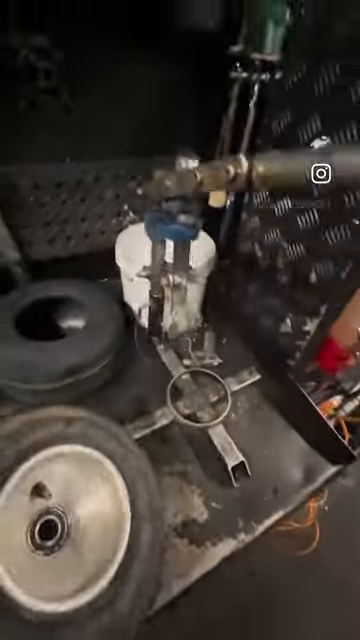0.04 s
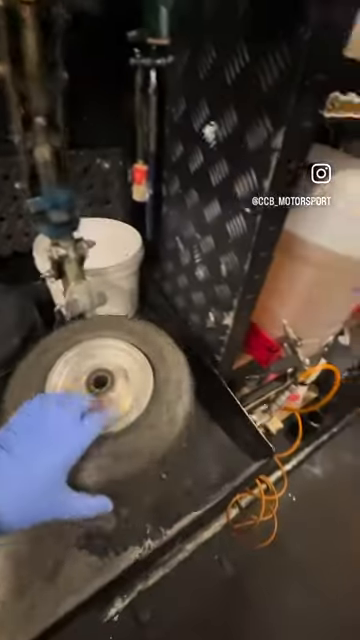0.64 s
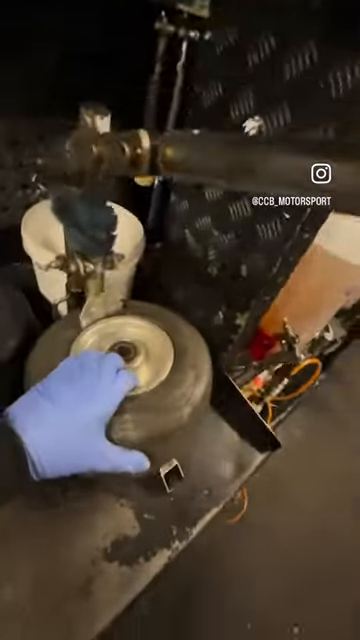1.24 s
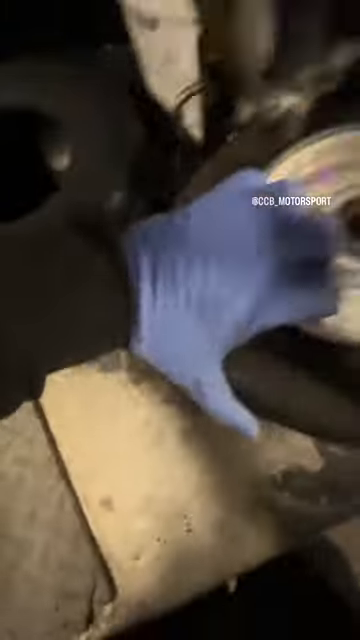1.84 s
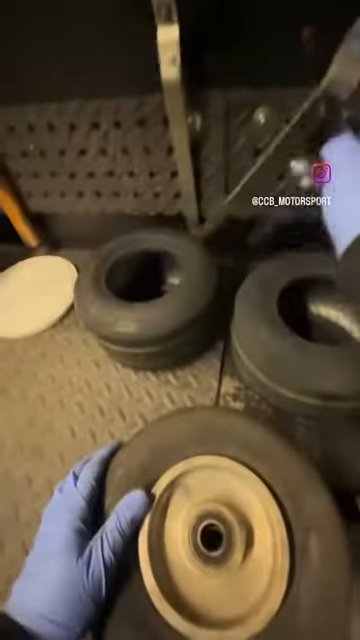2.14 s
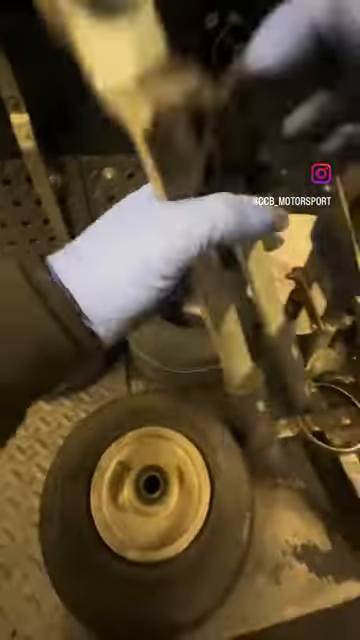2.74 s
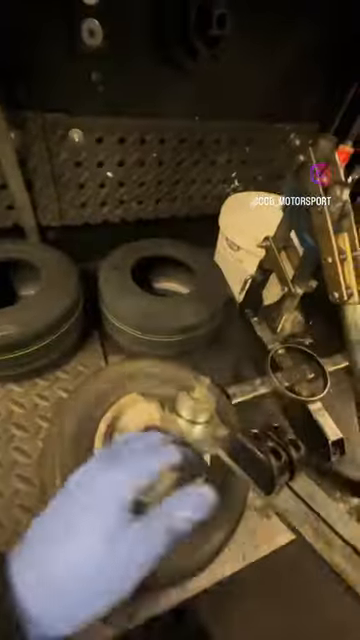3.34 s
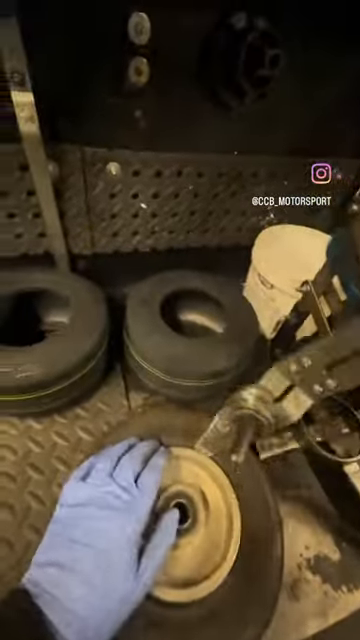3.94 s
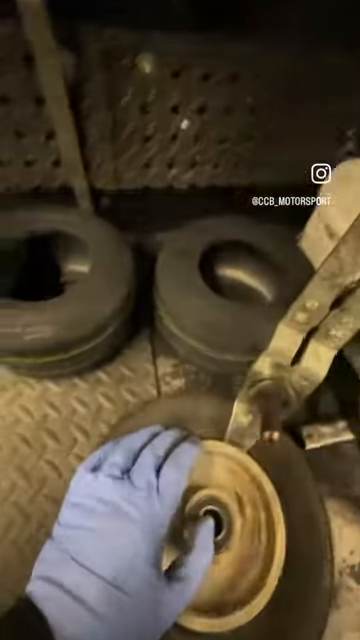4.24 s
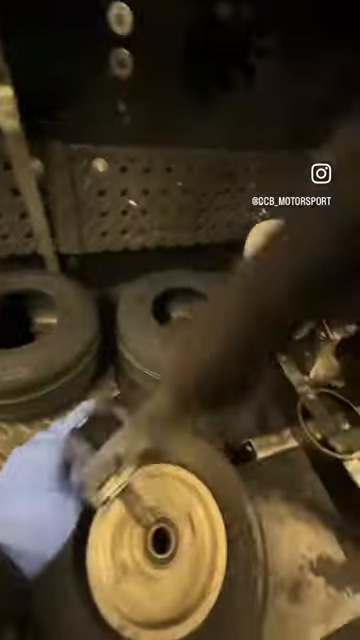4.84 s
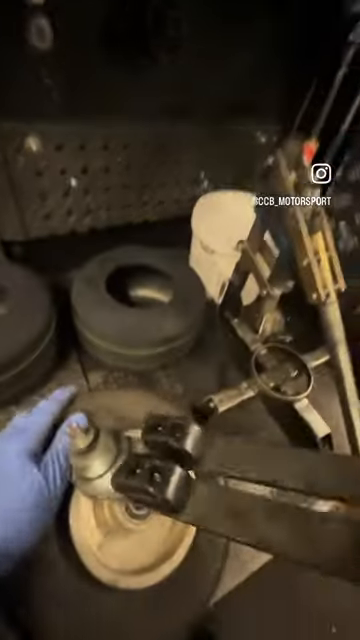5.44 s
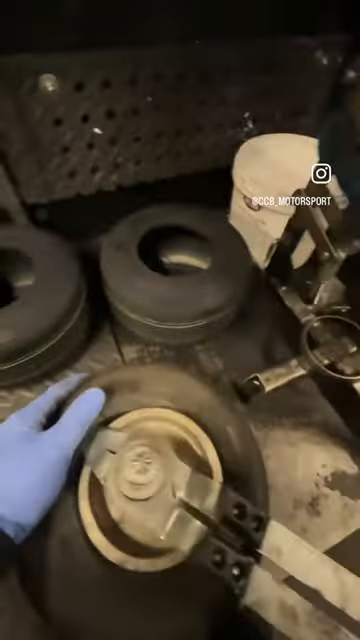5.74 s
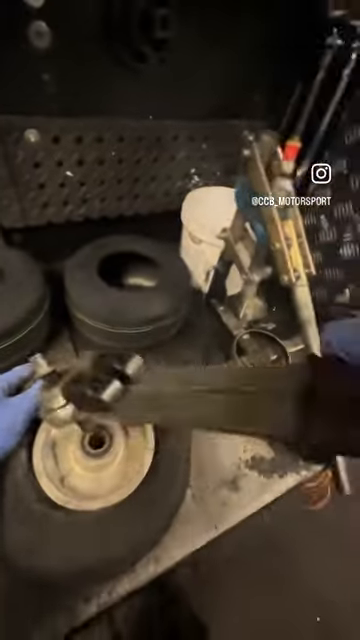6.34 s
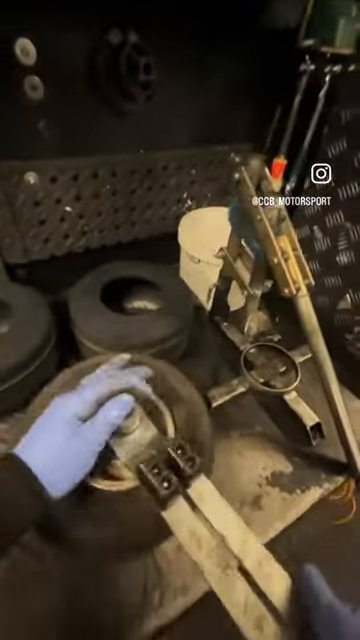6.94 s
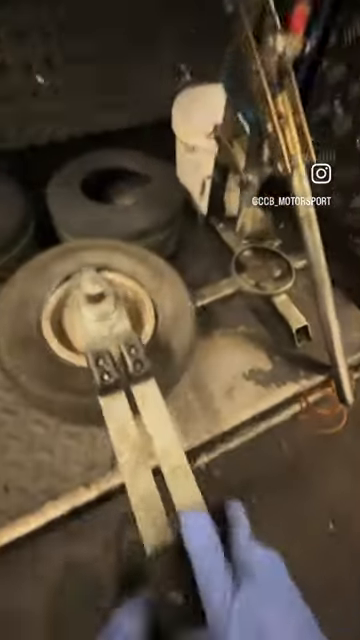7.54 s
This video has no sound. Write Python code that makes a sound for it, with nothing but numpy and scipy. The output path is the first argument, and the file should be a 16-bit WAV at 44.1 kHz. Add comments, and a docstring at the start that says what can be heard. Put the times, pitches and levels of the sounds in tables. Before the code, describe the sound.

A small wheel knocks on a steel bench as a tyre lever clanks, clinks and scrapes, with rubber rubbing and gloves rustling up close.

```python
"""A small wheel knocks on the steel bench of a manual tyre changer as it is dropped, dragged and levered.
Each knock rings the tyre and rim and shakes the bench. The lever's loose joint clinks, steel scrapes
on steel, and rubber rubs, skids and creaks as it sticks and slips. Gloves rustle and a sleeve brushes
the microphone. Everything is close, in a cramped workshop with little echo."""
import sys
import numpy as np
from scipy import signal
from scipy.fft import rfft, irfft
from scipy.io import wavfile

SR = 44100
rng = np.random.default_rng(int(sys.argv[2]) if len(sys.argv) > 2 else 0)


def pcm_store(signal):
    """Save signal as 16-bit PCM."""
    levels = np.round(np.clip(np.atleast_2d(signal), -1, 1) * 32767)
    wavfile.write(sys.argv[1], SR, levels.astype(np.int16).T)


N = 338688
TIME = np.arange(N) / SR
AGE = np.arange(SR // 2) / SR   # seconds since a knock
EARLY_TICK_LEAD_S, EARLY_TICK_DB = 0.0051, -16.5   # a faint early tick about 5 ms before each hit

# The modes (natural ringing notes) of the wheel and of the steel lever.
# Each row: pitch in Hz, level in dB, t60 (the seconds it takes to fade by 60 dB).
WHEEL_MODES = [(234.6, -4, 0.089), (270.7, 0, 0.21), (311, -8.5, 0.25), (361.5, 1, 0.17), (420.6, -7, 0.18),
               (489.4, 0.5, 0.16), (534, 5.5, 0.075), (620, -3, 0.056)]
LEVER_MODES = [(941, 5.5, 0.14), (1091, -7, 0.14), (1322, 4.5, 0.096), (1677, -2.5, 0.067),
               (2150, -1, 0.16), (2256, 7.5, 0.13), (2930, 3, 0.14), (3130, 9.5, 0.064), (3310, -6.5, 0.17),
               (3570, -11, 0.17), (4030, -10.5, .11), (4600, -9, 0.12), (7150, -4, .14),
               (8340, -14.5, 0.22)]
# The microphone's two openings. Each row: frequency in Hz, how alike room sound is in both (-1 to 1),
# how far the left leads in radians, how much louder the left is in dB.
MIC_PORTS = [(60, .98, -.25, .4), (149, .97, .45, -.3), (302, 0.99, -1.18, -3.5), (547, 0.015, 0.98, -2),
             (860, -0.52, -0.54, 1.5), (1180, -0.18, 0.7, 2), (1890, 0.68, 0.82, 1), (2800, -0.59, 4, -1.5),
             (4330, 0.4, 3.5, -1.5), (6240, 0.81, 3.5, 0), (8600, 0.67, 6.5, -1), (9920, 1, 9, 1)]


def from_db(db):
    """Turn decibels into a number to multiply by."""
    return 10 ** (np.asarray(db) / 20)


def rms_one(x):
    """Scale a sound so that its average strength (rms) is 1."""
    return x / np.sqrt(np.mean(x ** 2) + 1e-20)


def unit_blow(x):
    """Scale a hit so that its first 30 ms have an average strength of 1."""
    return x / np.sqrt(np.mean(x[..., :SR * 3 // 100] ** 2) + 1e-20)


def add(out, start_s, sound):
    """Mix a short sound in at a given time."""
    start = round(start_s * SR)
    out[:, start:start + len(AGE)] += sound[..., :N - start]


def at_hz(rows, hz, column=1):
    """Look up a table's value at any frequency, sliding between its rows."""
    table = np.array(rows)
    return np.interp(np.log(np.maximum(hz, 1)), np.log(table[:, 0]), table[:, column])


def band(x, low_hz, high_hz, order=2):
    """Keep the part of a sound between two frequencies."""
    edges = [low_hz, min(high_hz, SR / 2 - 1)]
    return signal.sosfilt(signal.butter(order, edges, "band", fs=SR, output="sos"), x)


def drift(per_s):
    """A value that wanders at random."""
    points = rng.standard_normal(int(N / SR * per_s) + 2)
    return np.interp(TIME * per_s, np.arange(len(points)), points)


def diffuse(size):
    """Stereo noise, as alike on left and right as sound arriving from all around."""
    alike = np.clip(at_hz(MIC_PORTS, np.fft.rfftfreq(size, 1 / SR)), -1, 1)
    mid, side = rfft(rng.standard_normal((2, size)))
    return irfft(np.sqrt((1 + alike) / 2) * mid + np.sqrt((1 - alike) / 2) * side * [[1], [-1]], size)


def colour(noise, tone):
    """Shape a noise's lows and highs by a table, cutting steeply beyond its ends."""
    hz = np.fft.rfftfreq(N, 1 / SR) + 1
    roll_off = np.minimum(1, np.minimum(hz / tone[0][0], tone[-1][0] / hz)) ** 6
    return rms_one(irfft(rfft(noise) * from_db(at_hz(tone, hz)) * roll_off, N))


def slips(per_s, spread_db):
    """Uneven random clicks of a surface that sticks and lets go."""
    sizes = from_db(spread_db * np.minimum(rng.exponential(1, N), 4)) * rng.choice([-1, 1], N)
    return rms_one(sizes * (rng.random(N) < per_s / SR))


def dying(t60):
    """A fade that falls 60 dB in t60 seconds."""
    return np.exp(-np.log(1000) * AGE / t60)


def swells(moves, still_db, edge_db):
    """Loudness of movements rising out of a steady background, each edge_db down at its ends."""
    power = sum(from_db(db - edge_db * np.abs(2 * (TIME - middle_s) / length_s) ** 1.5) ** 2
                for middle_s, length_s, db in moves)
    return np.sqrt(from_db(still_db) ** 2 + power)


def slide(start_s, length_s, rise_s, sag_db_per_s, fade_db_per_s):
    """Loudness of a sliding touch: it builds up, sags while it lasts and fades away."""
    age = np.maximum(TIME - start_s, 0)
    drop_db = sag_db_per_s * age + fade_db_per_s * np.maximum(age - length_s, 0)
    return np.minimum(age / rise_s, 1) * from_db(-drop_db)


def ringing(modes, scatter_db):
    """Modes struck together, each with a random strength and point in its cycle."""
    return sum(from_db(db + scatter_db * rng.standard_normal()) * dying(t60)
               * np.sin(2 * np.pi * (hz * AGE + rng.random())) for hz, db, t60 in modes)


def favoured(modes, pitch_hz, spread_octaves):
    """The spot that is hit brings out the modes near one pitch."""
    return [(hz, db - 6 * min((np.log2(hz / pitch_hz) / spread_octaves) ** 2, 3), t60)
            for hz, db, t60 in modes]


def burst(low_hz, high_hz, t60, room_db, room_t60):
    """A click sets many modes going; they die fast and leave a weaker tail in the room."""
    room = diffuse(len(AGE))
    direct = (0.7 * rng.standard_normal(len(AGE)) + 0.73 * room) * dying(t60)
    direct[:, 0] += 0.72 * np.linalg.norm(direct[0])   # the click
    tail = from_db(room_db) * room * dying(room_t60)
    return unit_blow(band(direct + tail, low_hz, high_hz, order=3))


def shoves():
    """As weight shifts on the wheel, the bench rumbles and rubber creeps over steel."""
    # Each row: middle in seconds, length in seconds, rumble level in dB, rub level in dB.
    pushes = [(0.76, 0.75, -33, -32), (1.312, 0.16, -52, -32.5), (1.756, 0.3, -30.5, -39),
              (2.246, 0.26, -38, -41), (3.376, 0.19, -36.5, -63), (4.278, 0.32, -26.5, -30),
              (4.752, 0.49, -33, -31.5), (5.627, 0.4, -32.5, -34), (6.656, 0.11, -25, -26.5),
              (7.283, 1, -39, -41), (7.68, 0.24, -42.5, -29.5)]
    # The tone of the bench and of the rubber. Each row: frequency in Hz, level in dB.
    rumble_tone = [(12, -56), (20, -25), (31, -25), (49, 4), (76, -2.5), (108, 4.5), (189, -13.5),
                   (230, -15.5), (300, -15.5), (510, -120)]
    rub_tone = [(120, -38.5), (200, -10.5), (232, -3), (387, 0.5), (411, 2), (474, -3), (801, -8.5),
                (1000, -14), (1300, -31.5), (2200, -120)]
    rumble = swells([(s, length, db) for s, length, db, _ in pushes], still_db=-40.5, edge_db=6)
    rub = swells([(s, length, db) for s, length, _, db in pushes], still_db=-44.5, edge_db=6.5)
    creep = (diffuse(N) + 0.39 * slips(per_s=120, spread_db=-3.5)) * from_db(0.87 * drift(per_s=22))
    return rumble * colour(diffuse(N), rumble_tone) + rub * colour(creep, rub_tone)


def gloves():
    """A sliding glove or sleeve rustles, with a fine hiss on top."""
    # Each row: middle in seconds, length in seconds, rustle level in dB, hiss in dB above the rustle.
    strokes = [(0.147, 0.34, -44, -8.5), (0.597, 0.28, -30.5, -14), (0.892, 0.54, -42, -12.5),
               (1.405, 0.29, -36, -4.5), (1.748, 0.33, -36.5, -18.5), (1.882, 0.14, -46.5, -0.5),
               (2.63, 0.31, -43, 1.5), (2.958, 0.28, -41.5, -9.5), (3.287, 0.34, -41.5, -5.5),
               (3.776, 0.22, -43, -1.5), (4.241, 0.45, -40.5, -11), (4.623, 0.32, -35.5, -5.5),
               (5.068, 0.39, -44, -1.5), (5.512, 0.4, -41.5, -8.5), (5.784, 0.31, -42.5, -16.5),
               (6.637, 0.16, -36.5, -9.5), (6.816, 0.12, -39.5, -12.5), (7.11, 0.18, -50, -1),
               (7.38, 0.27, -45.5, -12.5), (7.54, 0.11, -40, -0.5), (7.68, 0.11, -30, -16)]
    # The two tones of the cloth. Each row: frequency in Hz, level in dB.
    rustle_tone = [(530, -26), (900, 2), (1050, 1.5), (1450, 1), (2430, -1.5), (2690, 1.5), (2940, -4),
                   (4350, 2), (5600, -8), (7800, -63.5), (13200, -120)]
    hiss_tone = [(5500, -7), (6800, -4.5), (8200, -7.5), (9300, -9), (10500, -30)]
    rustle = swells([(s, length, db) for s, length, db, _ in strokes], still_db=-51.5, edge_db=8.5)
    hiss = swells([(s, length, db + hiss_db) for s, length, db, hiss_db in strokes],
                  still_db=-63, edge_db=9.5)
    cloth = (diffuse(N) + 0.44 * slips(per_s=130, spread_db=4)) * from_db(1.04 * drift(per_s=35))
    return rustle * colour(cloth, rustle_tone) + hiss * colour(cloth, hiss_tone)


def rim_scrapes():
    """The rim catches on steel in quick little jerks that ring the lever."""
    # Each row: start in seconds, length in seconds, level in dB, strongest pitch in Hz.
    scrapes = [(0.118, .035, -37, 1980), (0.511, 0.0074, -25.5, 2900), (1.846, 0.017, -37.5, 2700),
               (4.164, 0.031, -17, 3680), (5.804, 0.02, -36.5, 1590), (6.387, 0.016, -29, 2950),
               (7.092, 0.018, -40.5, 3500), (7.616, 0.1, -34.5, 2210)]
    out = np.zeros((2, N))
    grinding = slips(per_s=940, spread_db=5) + 0.63 * diffuse(N)
    grit = rms_one(band(grinding, 620, 5000))
    for start_s, length_s, db, pitch_hz in scrapes:
        screech = rms_one(band(grinding, 0.88 * pitch_hz, pitch_hz / 0.88, order=1))
        level = from_db(db) * slide(start_s, length_s, rise_s=0.0017, sag_db_per_s=37, fade_db_per_s=896)
        out += level * (from_db(-6.5) * grit + from_db(-1.5) * screech)
    ring = signal.fftconvolve(out, ringing(LEVER_MODES, scatter_db=2)[None], axes=1)[:, :N]
    return out + from_db(-9.5) * rms_one(ring) * np.sqrt(np.mean(out ** 2))


def steel_blow(hardness_db):
    """Steel hits steel with a low clank, a crack and a high tick; harder hits sound brighter."""
    lower = burst(610, 1214, t60=0.05, room_db=-16, room_t60=0.55)
    upper = burst(915, 2660, t60=0.021, room_db=-14.5, room_t60=0.2)
    clank = unit_blow(lower + from_db(np.clip(0.5 * hardness_db - 1.5, -6, 8)) * upper)
    crack = burst(2500, 5380, t60=0.044, room_db=-19.5, room_t60=0.25)
    tick = burst(3500, 8800, t60=0.021, room_db=-20, room_t60=0.17)
    return from_db(-hardness_db) * clank + from_db(-2) * crack + from_db(hardness_db - 12) * tick


def ping(hz, t60):
    """One short note of steel."""
    return unit_blow(ringing([(hz, 0, t60)], scatter_db=0))


def lever_note(note_hz):
    """The lever pings at one note, and its modes near that note ring on."""
    ring = unit_blow(ringing(favoured(LEVER_MODES, note_hz, spread_octaves=0.37), scatter_db=1))
    return unit_blow(ping(note_hz, t60=0.035) + from_db(-3) * ring)


def wheel_bonk(pitch_hz, swell_s=0.0031):
    """A hollow bonk that the rubber soon stops; the wheel rings on softly, with a short rattle."""
    bonk = unit_blow((AGE / swell_s) * np.exp(-AGE / swell_s) * np.sin(2 * np.pi * pitch_hz * AGE))
    fade_in = (1 - np.exp(-AGE / (2 * swell_s))) ** 2
    ring = fade_in * ringing(favoured(WHEEL_MODES, pitch_hz, spread_octaves=0.24), scatter_db=3.5)
    rattle = burst(0.62 * pitch_hz, 1.5 * pitch_hz, t60=0.055, room_db=-9, room_t60=0.42)
    return unit_blow(bonk + from_db(-3.5) * unit_blow(ring) + from_db(-5) * rattle)


def bench_thud(rise_s=0.021):
    """The heavy bench takes a moment to get moving, then booms and rattles."""
    # Each row: pitch in Hz, level in dB, seconds to fade by 60 dB.
    bench_modes = [(63, -4.5, 0.36), (95.4, -9.5, 0.17), (111.8, 6, 0.2), (141.6, 4, 0.19),
                   (173.2, -4.5, 0.21)]
    boom = unit_blow(ringing(bench_modes, scatter_db=-3))
    rattle = from_db(-2) * burst(53, 210, t60=0.18, room_db=-15, room_t60=0.92)
    return 1.48 * (boom + rattle) * (1 - np.exp(-AGE / rise_s))


def knocks():
    """Each knock sounds steel, lever, wheel and bench at once, just after a faint early tick."""
    # Each row: start in seconds, bench level in dB, wheel level in dB, wheel pitch in Hz, steel level
    # in dB, hardness in dB (more is brighter), lever note in Hz, that note's level in dB.
    hits = [(.239, -49, -28, 420, -30.5, 7.5, 2900, -53), (0.428, -38.5, -12.5, 545, -25.5, -3, 905, -22),
            (.446, -19.5, -12, 473, -25.5, 1, 1620, -30.5), (.507, -17.5, -15, 625, -23, -3, 2800, -26),
            (.527, -21.5, -14.5, 478, -35, -11, 915, -27), (.661, -19.5, -24, 400, -32, -3.5, 2800, -37),
            (.832, -22.5, -11.5, 497, -23, 0, 722, -27), (.859, -26, -16, 481, -34, -4, 1690, -37),
            (0.966, -28.5, -25.5, 232, -45, 6, 915, -51), (1.29, -31, -29, 527, -60, -3, 940, -53),
            (1.632, -36, -29.5, 310, -45, -5, 955, -52.5),
            (2.069, -29.5, -28.5, 292, -22.5, 5.5, 1842, -28.5),
            (2.152, -26.5, -17, 343, -36, -10, 953, -38), (3.26, -52, -30.5, 493, -19.5, 6.5, 1855, -28),
            (3.269, -30.5, -27, 464, -28.5, 11, 2900, -38.5), (3.566, -29, -35.5, 343, -27, 10, 3320, -36),
            (3.588, -53, -28.5, 310, -29, 5.5, 4160, -35), (4.045, -21, -20, 323, -27.5, -3.5, 1037, -25.5),
            (4.168, -12, -19, 332, -23.5, 12, 3600, -26.5), (4.195, -13, -16.5, 327, -23.5, 4, 2830, -20),
            (4.31, -22.5, -20.5, 250, -66, -8, 920, -51), (4.343, -11.5, -8, 315, -23.5, -4.5, 1193, -22.5),
            (4.441, -14, -16, 324, -20, 12, 3000, -13.5), (4.59, -16.5, -10, 460, -26.5, -2.5, 870, -37),
            (4.693, -20, -11.5, 480, -35.5, -7, 1390, -38), (4.742, -40, -16, 519, -34, 2.5, 960, -29),
            (4.875, -26, -10, 487, -34, -5.5, 1140, -39), (4.927, -25, -22, 498, -30, -1, 2870, -36.5),
            (5.329, -20, -10.5, 516, -29, -8.5, 1204, -33),
            (5.349, -17.5, -13.5, 478, -27.5, -7, 1600, -29), (5.42, -19, -24.5, 393, -41, 4, 1286, -42),
            (5.505, -16, -15.5, 412.5, -21, -2, 1735, -23), (5.543, -18, -19.5, 336, -29, 13, 1420, -32),
            (5.771, -20, -20.5, 421, -38, -12.5, 920, -50), (5.806, -45, -25, 416, -38.5, -11, 1035, -33.5),
            (5.982, -35, -24, 395, -39.5, -2.5, 3010, -42.5), (6.38, -45, -22.5, 614, -32, -7, 930, -31.5),
            (6.392, -18.5, -12.5, 422, -31.5, -8.5, 3060, -44),
            (6.538, -26.5, -30.5, 340, -57, -13, 1730, -45),
            (6.659, -16.5, -29.5, 355, -37.5, -11.5, 1600, -33.5),
            (6.671, -20.5, -23, 370, -28.5, -2, 1375, -27), (6.792, -31, -28, 400, -34, -8, 2050, -33),
            (6.921, -19.5, -21, 380, -50, -24, 1224, -31.5),
            (7.568, -23, -28.5, 500, -28.5, 5.5, 3240, -32)]
    out = np.zeros((2, N))
    for start_s, bench_db, wheel_db, pitch_hz, steel_db, hardness_db, note_hz, note_db in hits:
        steel = from_db(steel_db) * steel_blow(hardness_db)
        lever = from_db(note_db) * lever_note(note_hz)
        wheel = from_db(wheel_db) * wheel_bonk(pitch_hz)
        bench = from_db(bench_db) * bench_thud()
        add(out, start_s, steel + lever + wheel + bench)
        early_tick = from_db(EARLY_TICK_DB + 0.5 * min(hardness_db, 0)) * steel   # weaker for dull hits
        add(out, start_s - EARLY_TICK_LEAD_S * rng.uniform(0.52, 1.7), early_tick)
    return out


def tyre_skids():
    """Rubber sticks and slips on the bench, and each slip sets the wheel ringing."""
    # Each row: start in seconds, length in seconds, level in dB.
    skids = [(0.455, 0.053, -13), (0.584, 0.077, -15), (3.276, 0.075, -28.5), (7.655, .025, -19.5)]
    level = sum(from_db(db) * slide(start_s, length_s, rise_s=0.0025, sag_db_per_s=60, fade_db_per_s=278)
                for start_s, length_s, db in skids)
    grip = level * (slips(per_s=530, spread_db=4.5) + 1.04 * diffuse(N))
    wheel = ringing(favoured(WHEEL_MODES, pitch_hz=470, spread_octaves=0.55), scatter_db=2)
    groan = signal.fftconvolve(band(grip, 190, 800), wheel[None], axes=1)[:, :N]
    grit = band(grip, 540, 864)
    return (rms_one(groan) + from_db(-5) * rms_one(grit)) * np.sqrt(np.mean(level ** 2))


def tread_creaks():
    """The gripped tread lets go in small, dry ticks."""
    # Each row: start in seconds, level in dB.
    ticks = [(1.176, -41), (1.188, -40.5), (1.209, -39), (1.22, -36.5), (1.235, -37.5), (1.282, -38),
             (3.009, -42), (3.042, -39.5), (6.553, -46), (7.421, -43.5), (7.524, -36.5), (7.538, -38),
             (7.552, -33.5)]
    out = np.zeros((2, N))
    for start_s, db in ticks:
        add(out, start_s, from_db(db) * burst(720, 5560, t60=0.015, room_db=-9, room_t60=0.043))
    return out


def sleeve_brush(start_s=1.386, length_s=0.07, squeak_s=0.014, squeak_hz=3470):
    """Cloth hisses and squeaks on the microphone, then lies flat, rasps and pumps air into it."""
    flat_s = start_s + squeak_s
    hiss = from_db(-12) * slide(start_s, length_s, rise_s=0.0039, sag_db_per_s=68, fade_db_per_s=647)
    squeak = from_db(-17) * slide(start_s, squeak_s, rise_s=0.008, sag_db_per_s=0, fade_db_per_s=700)
    rasp = from_db(-16) * slide(flat_s, length_s - squeak_s,
                                rise_s=0.016, sag_db_per_s=23, fade_db_per_s=906)
    puff = from_db(-14) * slide(flat_s, length_s=0.071, rise_s=0.018, sag_db_per_s=21, fade_db_per_s=384)
    threads = rng.standard_normal((2, N)) + 0.57 * slips(per_s=820, spread_db=1)
    whistle = rms_one(band(threads, 0.98 * squeak_hz, 1.02 * squeak_hz))
    bright = rms_one(band(threads, 2870, 4130)) + 0.52 * rms_one(band(threads, 6700, 8440))
    rough = rms_one(band(threads, 350, 1940))
    sway = signal.hilbert(band(rng.standard_normal(N), 52, 72))
    air = rms_one(np.cos(np.angle(sway)))   # an uneven flutter of even strength
    flap = from_db(-10) * rms_one(band(rng.standard_normal(N), 97, 258))
    return hiss * rms_one(bright) + squeak * whistle + rasp * rough + puff * (air + flap)


def microphone_bump(start_s=1.583, swell_s=0.009, final_hz=58, db=-11):
    """The arm bumps the microphone as it moves off: a soft thump that drops to a deep note."""
    out = np.zeros((2, N))
    hz = final_hz * (1 + 3 * dying(t60=0.027))
    level = from_db(db) * (AGE / swell_s) * np.exp(1 - AGE / swell_s)
    add(out, start_s, level * np.sin(2 * np.pi * np.cumsum(hz) / SR))
    return out


def joint_clinks():
    """The lever's light, loose joint gives a thin snap, a ping and a faint lasting ring."""
    # Each row: start in seconds, level in dB, hardness in dB, note in Hz, that note's level in dB.
    clinks = [(2.656, -28.5, 9, 8230, -23.5), (2.688, -25, 1.5, 1214, -27), (2.706, -36.5, 6, 8700, -31.5),
              (2.733, -29.5, 1.5, 3200, -31), (2.756, -39, -2.5, 1750, -44), (2.87, -25, 4, 1986, -27.5),
              (3.53, -48, -7, 3220, -34), (4.432, -30.5, 1, 2730, -26), (6.381, -51, 3, 8080, -43),
              (7.587, -42, -12, 1750, -41.5)]
    # Each row: pitch in Hz, level in dB, seconds to fade by 60 dB.
    joint_modes = [(1160, -3, 0.28), (1250, -2.5, 0.64), (1760, 2, 0.18), (3220, -4, .33), (7540, -7, .4),
                   (7650, -3.5, .5), (8236, -4.5, 0.5), (8300, -9, .45)]
    out = np.zeros((2, N))
    for start_s, db, hardness_db, note_hz, note_db in clinks:
        low = from_db(-1 - hardness_db) * burst(954, 2420, t60=0.038, room_db=-21, room_t60=0.3)
        middle = from_db(6.5) * burst(1860, 6250, t60=0.032, room_db=-24.5, room_t60=0.17)
        high = from_db(hardness_db - 6) * burst(7600, 8970, t60=0.026, room_db=-39, room_t60=0.37)
        snap = low + middle + high
        ring = from_db(-15) * unit_blow(ringing(joint_modes, scatter_db=2))
        add(out, start_s, from_db(db) * (snap + ring) + from_db(note_db) * ping(note_hz, t60=0.018))
        add(out, start_s - EARLY_TICK_LEAD_S, from_db(db + EARLY_TICK_DB) * snap)
    return out


def scene():
    """All the sounds together, close to the microphone."""
    wheel_work = knocks() + joint_clinks() + rim_scrapes() + tread_creaks() + tyre_skids()
    return wheel_work + sleeve_brush() + microphone_bump() + shoves() + gloves()


def record(dry):
    """Left and right get their own timing and level; peaks are rounded and the highest treble is cut."""
    hz = np.fft.rfftfreq(N, 1 / SR)
    side = np.array([[0.5], [-0.5]])
    timing = np.exp(1j * side * at_hz(MIC_PORTS, hz, column=2))
    balance = from_db(side * at_hz(MIC_PORTS, hz, column=3))
    heard = irfft(rfft(dry) * timing * balance, N)
    rounded = 1.065 * np.tanh(heard / 1.13)
    treble_cut = signal.ellip(10, 0.3, 80, 10000, fs=SR, output="sos")   # above 10000 Hz
    return signal.sosfilt(treble_cut, rounded)


dry = scene()
out = record(dry)
pcm_store(out)
```